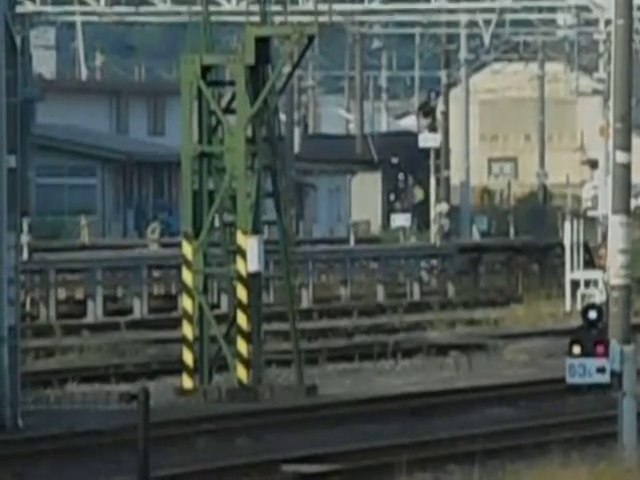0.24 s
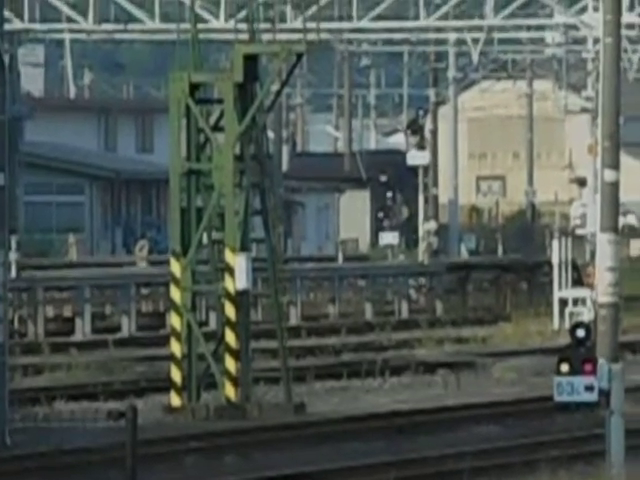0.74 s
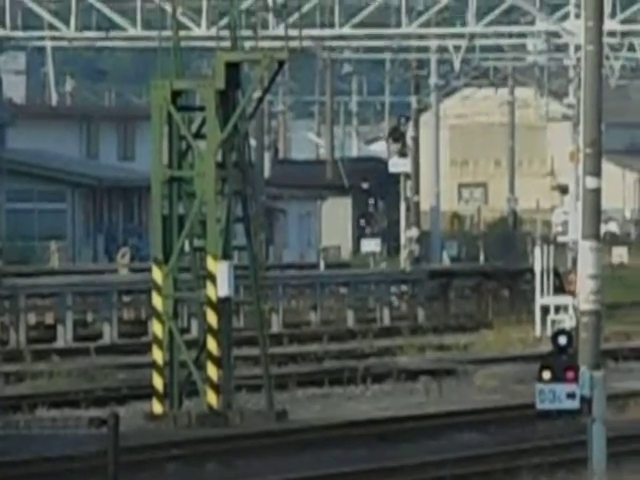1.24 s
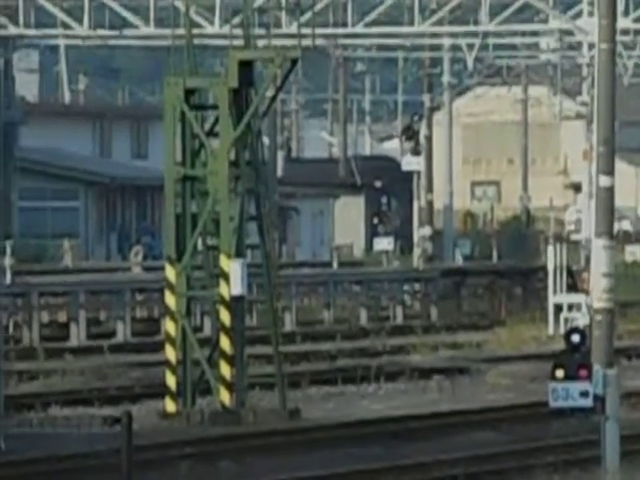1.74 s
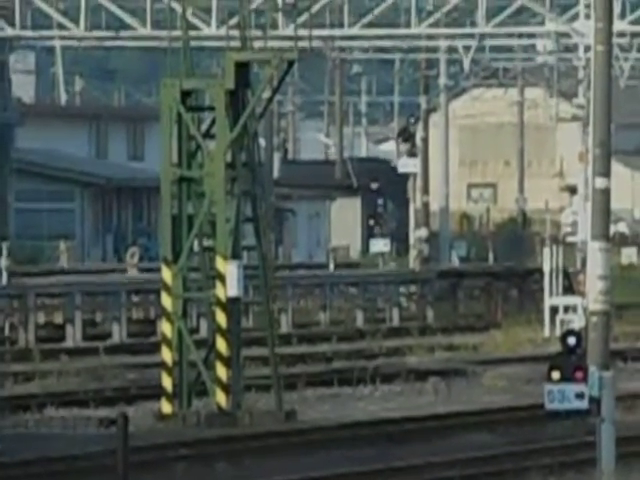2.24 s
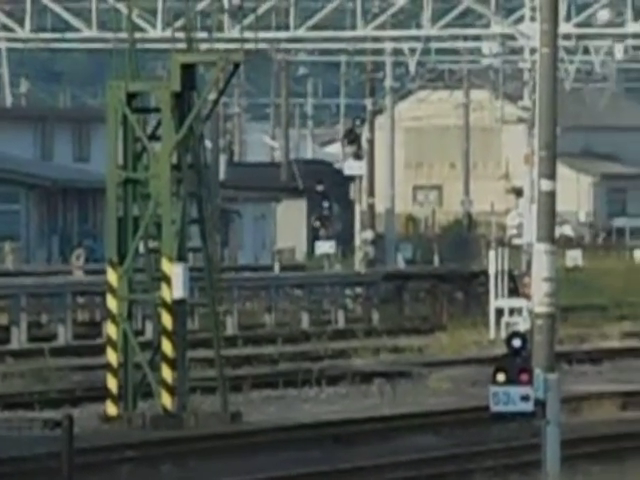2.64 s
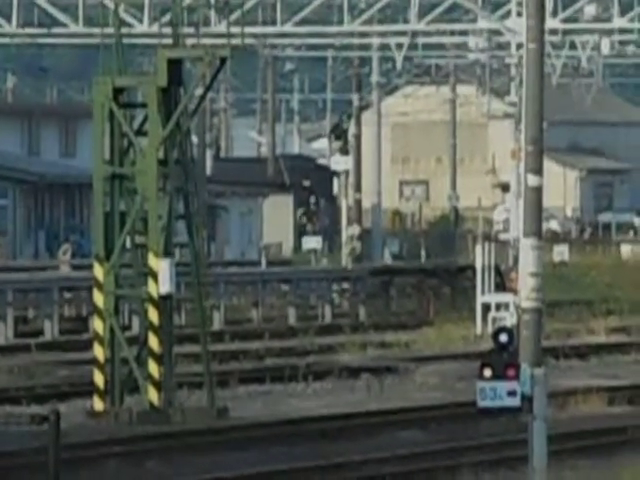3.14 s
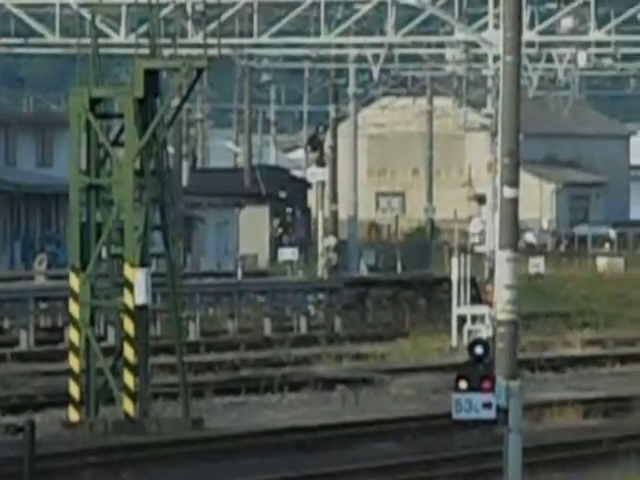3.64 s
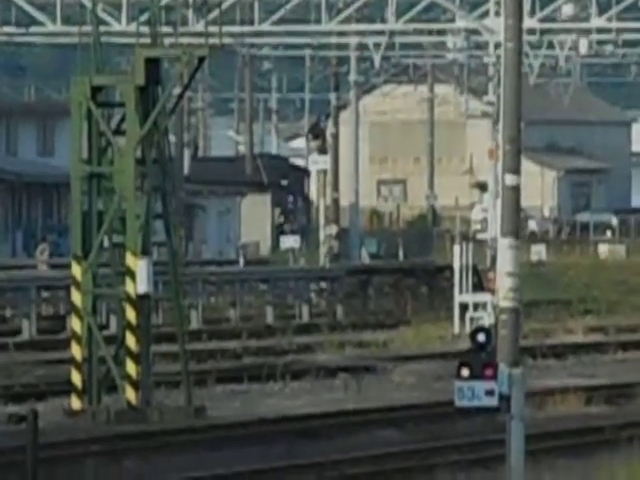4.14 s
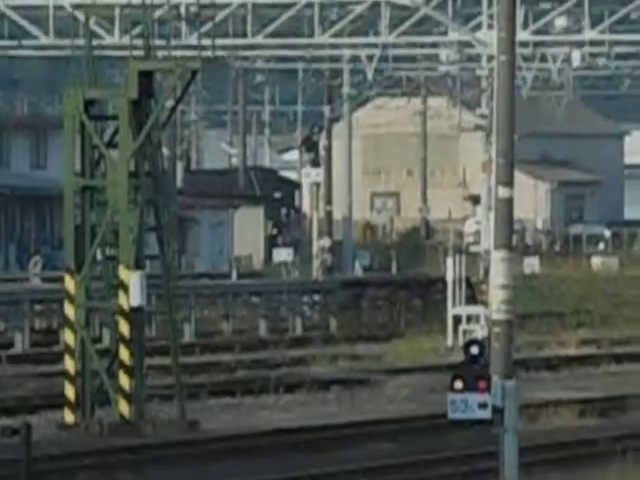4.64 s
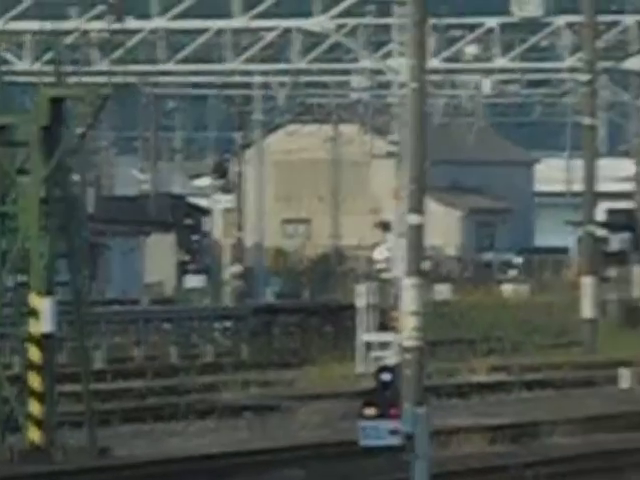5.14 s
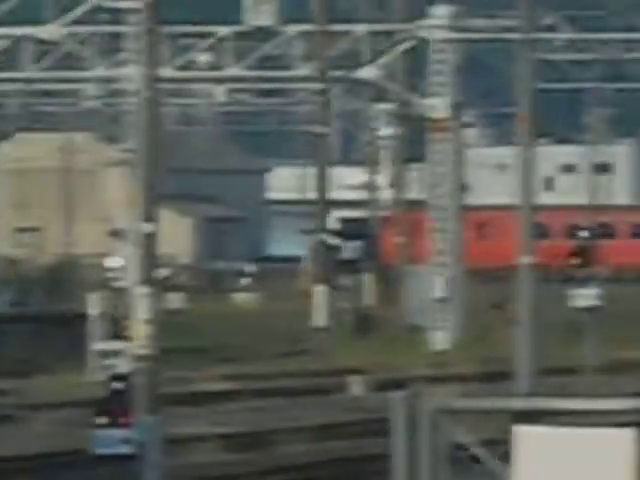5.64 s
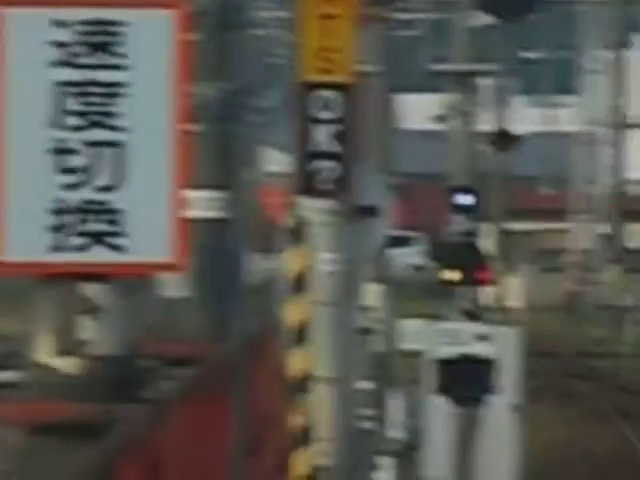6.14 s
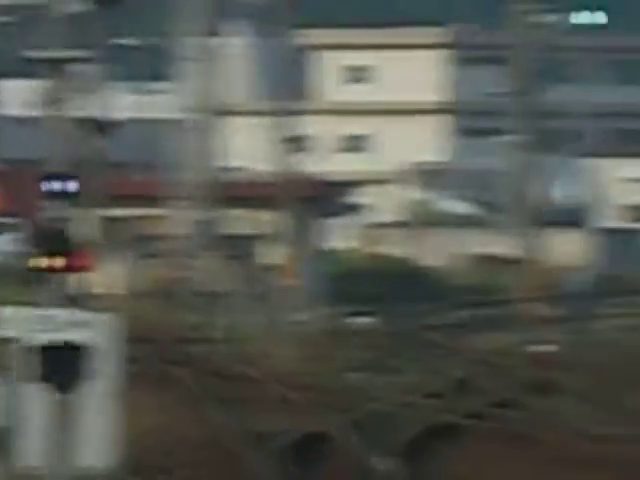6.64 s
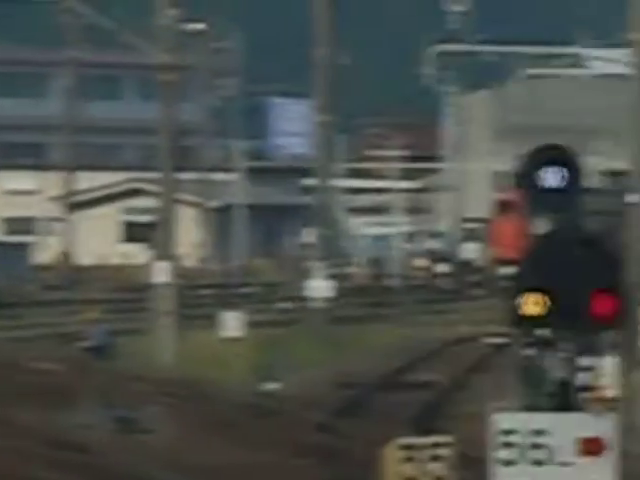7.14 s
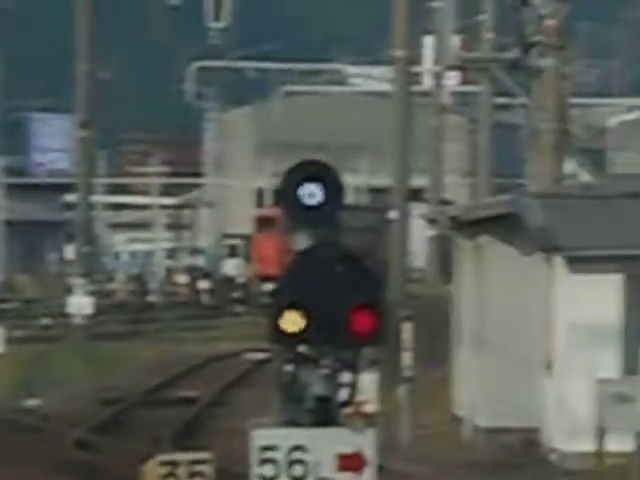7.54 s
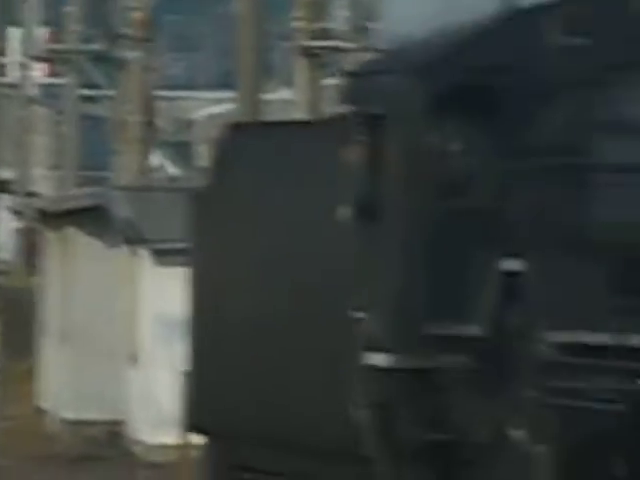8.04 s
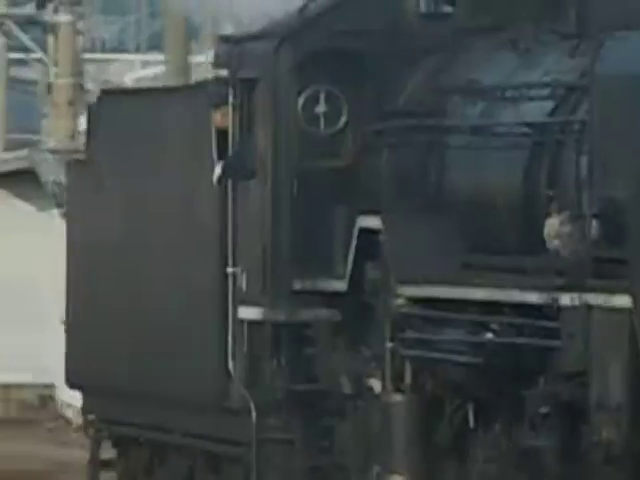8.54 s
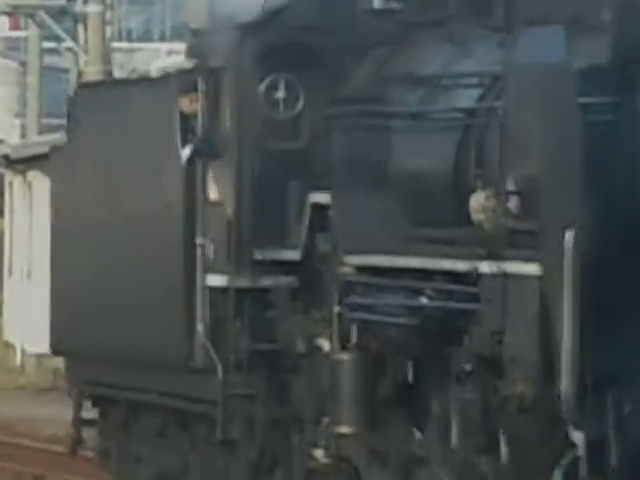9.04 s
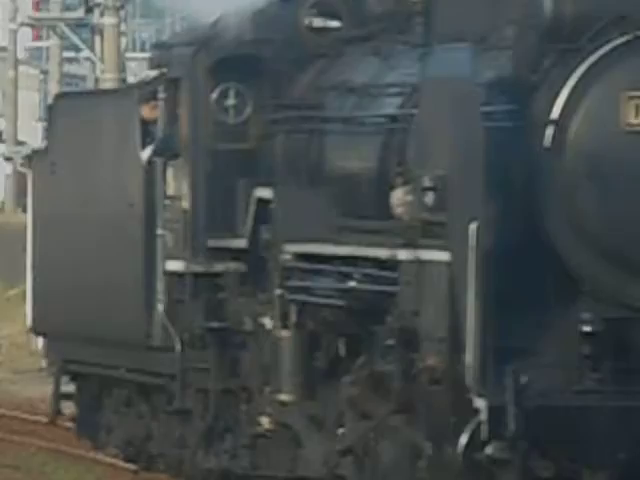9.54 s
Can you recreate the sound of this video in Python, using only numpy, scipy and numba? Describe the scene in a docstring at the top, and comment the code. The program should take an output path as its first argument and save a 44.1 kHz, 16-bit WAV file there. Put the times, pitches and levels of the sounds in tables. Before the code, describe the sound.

A steam locomotive is heard from one spot beside the track in a rail yard. From the start, a loud, bright steam hiss sputters and surges, almost burying a few wheel knocks, with one tiny squeak at 1.3 seconds. At about 2.9 seconds the hiss cuts off suddenly and the quieter rolling swells up: a gritty rumble, uneven knocks over rail joints, ringing rod clanks and hollow thumps, over a faint, thin whine. A wheel flange squeals in broken, rasping bursts from 3.2 to 4 seconds. Quick high chirps come around 4.8 and 5.2 seconds. The knocks and clanks are busiest until about 6 seconds, then thin out amid light scraping. From 8.1 to 8.8 seconds comes a run of chirps with another brief squeal. A wavering brake groan builds from about 8.4 seconds and fades near 9.8 as the rolling continues. Impacts carry a short, dull echo.

```python
"""Steam locomotive in a rail yard

From one spot beside the track: a creeping engine blows off steam so loudly that the camera's gain
control ducks everything else. The valve shuts, the gain comes back and the engine rolls past the
microphone: wheels knock over joints, the frame booms, rods clank, flanges squeal, a brake block
groans and the turbo-generator whines. Sheds and wagons echo around it."""
import sys
import numpy as np
from scipy import signal
from scipy.fft import rfft, irfft, next_fast_len
from scipy.io import wavfile
from scipy.ndimage import uniform_filter1d
from numba import njit

SR = 44100
rng = np.random.default_rng(int(sys.argv[2]) if len(sys.argv) > 2 else 0)


def wav_out(sig):
    """Save sig, one row per channel (or a flat mono array), as 16-bit PCM at SR to the path in sys.argv[1]."""
    wavfile.write(sys.argv[1], SR, np.round(np.clip(np.atleast_2d(sig).T, -1, 1) * 32767).astype(np.int16))


N = 431738
TIME = np.arange(N) / SR
PADDED = next_fast_len(N + SR // 2, real=True)
BIN_HZ = np.maximum(np.fft.rfftfreq(PADDED, 1 / SR), 1)

# the running gear as it passes the microphone: (time [s], level [dB], bass [dB], treble [dB])
PASS_BY = [(0, -1, -7, -5), (2.8, -2, -7.5, 5), (3.08, 0.5, -5.5, 9), (3.35, 1, -4, 3),
           (3.95, -0.5, -1, 4.5), (4.5, -0.5, -0.5, 2), (4.85, 0.7, 0.5, 1.5), (5.6, 0.5, -1.5, 1.5),
           (6.4, 0.45, 0.5, 0), (7.3, .5, -2, -0.5), (7.85, -1, 0, -1.5), (8.25, 0.4, -1, 0),
           (8.62, 0.4, -0.5, -2.5), (9.2, -4, -1, -3), (9.78, -4, 0.5, -2.5)]
# resonances of wheels, rails and frame: (frequency [Hz], width [Hz], lift [dB])
STEEL_MODES = [(339, 69, 3), (527, 56, 3.5), (620, 36, 3.5), (718, 34, 4), (796, 33, 1), (1079, 77, 4.5),
               (1584, 190, 3), (2070, 98, 5), (2730, 170, 2), (3280, 150, 3)]


def steam(shut_s=2.888, closing_s=0.055, note_width_hz=1170, ground_lag_s=0.000308, ground_fade_s=1):
    """A turbulent jet; carried water makes it sputter and surge, and the ground echo colours it."""
    # the jet's spectrum: (frequency [Hz], density [dB])
    spectrum = [(400, -54), (1000, -28), (1400, -21.5), (1800, -11.5), (2400, -7.5), (3400, -2.5),
                (4200, -3.5), (5400, -4), (6900, -4), (8000, -6.5), (9200, -9.5), (10000, -16.5),
                (10600, -29)]
    # the jet chokes now and then: (centre time [s], length [s], depth [dB])
    chokes = [(0.543, 0.2, 1), (1.138, 0.25, 4), (1.453, 0.48, 1), (2.387, 0.19, 0.7)]
    # swells around one pitch: (centre time [s], length [s], pitch [Hz], width [octaves], level [dB])
    surges = [(0.077, 0.61, 3380, 0.53, -13.5), (.22, 0.93, 6750, .13, -16), (0.676, 0.2, 6600, .15, -12),
              (.9, 1, 8700, 0.13, -17), (1.297, 0.15, 7300, 0.35, -10), (1.357, 0.11, 3060, 0.96, -11),
              (1.508, 0.9, 2760, 1, -9.5), (1.69, .25, 6300, 0.23, -9), (1.84, .16, 2500, 0.22, -23),
              (2.05, 1, 4260, 0.4, -13), (2.46, .24, 7640, 0.18, -11.5), (2.493, 0.61, 3420, 0.67, -10.5),
              (2.69, 0.58, 4100, 0.65, -6), (2.797, 0.13, 6950, 0.44, -11)]
    # the outlet's resonance sinks and wavers: (time [s], pitch [Hz], level [dB])
    outlet_note = [(0, 5750, -9.5), (.33, 5850, -9), (.45, 5530, -8), (.68, 5670, -11.5), (.95, 5445, -10),
                   (1.2, 5420, -9), (1.42, 5350, -16), (1.6, 5360, -8.5), (1.8, 5540, -15),
                   (1.98, 5480, -8), (2.25, 5210, -11.5), (2.42, 4820, -15), (2.66, 5120, -9.5),
                   (2.84, 5460, -21)]
    flutter_db, sputter_db = 0.5 * walk(15), 0.46 * walk(130)
    flow_db = flutter_db + sputter_db - sum(swell(*row) for row in chokes)
    eddies, timbre, jet = rng.standard_normal(N), colour(spectrum), 0
    for db, band in zip((-15.5, -9, -15), three_bands(4290, 7170)):  # rush, hiss, sizzle
        flicker_db = 1.04 * walk(16) + 0.4 * walk(5.04)
        jet += unit(shaped(eddies, band ** 2 * timbre)) * undb(db + flicker_db)
    for s, length, hz, octaves, db in surges:
        surge = unit(shaped(rng.standard_normal(N), bell(BIN_HZ, hz, octaves) * timbre))
        jet += surge * swell(s, length, undb(db))
    note_hz, note_db = curves(outlet_note)
    jet += gliding_noise(note_hz, note_width_hz) * undb(note_db)
    ground_gain = 0.12 * np.clip(1 - TIME / ground_fade_s, 0, 1)  # fades as the engine moves
    jet += ground_gain * np.interp(TIME - ground_lag_s, TIME, jet)
    opening = np.clip((shut_s - TIME) / closing_s, 0, 1)
    return yard(jet * undb(flow_db) * opening, t60=0.87, wet_db=-17.5, damp_hz=7400)


def rolling(steel, grit=0.34, bass_hz=260):
    """Rough treads crush grit; level and colour shift as the engine comes alongside."""
    level_db, bass_db, treble_db = curves(PASS_BY)
    judder_db = 0.5 * walk(27)
    contact = rng.standard_normal(N) + grit * grains(rate=1200)
    bands_db = (-40.5, -37, -42.5 + treble_db)  # rumble, clatter, scrape
    out = 0
    for db, band in zip(bands_db, three_bands(950, 3380)):
        flicker_db = walk(12.3)
        out += unit(shaped(contact, steel * band ** 2)) * undb(db + level_db + judder_db + flicker_db)
    return out + shaped(out, below(bass_hz, order=8)) * (undb(bass_db) - 1)


def knocks(steel, rise_s=0.0037, decay_s=0.026, halving_db=40, lowest_hz=170, ring_db=-5.5):
    """Joint knocks and clinks ring and rattle; hard knocks are bright and short, heavy ones dull."""
    # wheels strike rail joints: (time [s], level [dB], brightness [dB/octave])
    joints = [(.191, -18.5, -2), (.411, -19, 3), (.65, -26, -2), (0.905, -22, -7), (1.187, -26, -4.5),
              (1.245, -20, 0.5), (1.292, -19, 0.5), (1.419, -27, -4), (1.561, -34, -7), (1.87, -32, -10),
              (3.06, -26, 2.5), (3.211, -32, -3), (3.253, -26, 1), (3.332, -25.5, 0.5),
              (3.383, -26.5, -0.5), (3.494, -24.5, 1), (3.621, -25, -2), (3.672, -31.5, -2.5),
              (4.02, -25.5, -1.5), (4.192, -25, -1.5), (4.48, -28.5, -2.5), (4.635, -31, -9),
              (4.647, -23.5, 3.5), (4.795, -25, -1.5), (5.28, -27.5, 0.5), (5.322, -26, -1.5),
              (5.384, -31.5, 1.5), (5.432, -25.5, 6.5), (5.556, -26, -1), (6.315, -31, 0),
              (6.368, -30.5, -3), (6.938, -32, 2), (6.988, -30.5, -0.5), (7.346, -28.5, -0.5),
              (7.379, -32, 0.5), (8.507, -33, -1), (8.621, -30.5, -1.5), (8.881, -30, -4.5),
              (9.023, -31, -2), (9.416, -32, -6)]
    out, t = np.zeros(N), TIME[:SR // 4]
    contact = rng.standard_normal(N) + 0.23 * grains(rate=1600)
    shaking = shaped(contact, steel * (1 - below(lowest_hz)))
    octaves = np.log2(np.clip(np.fft.rfftfreq(len(t), 1 / SR), 400, 7000) / 1000)
    blows = [(s, db, bright, decay_s * .5 ** (bright / halving_db)) for s, db, bright in joints]
    blows += clinks()
    chances = rng.standard_normal((100, 2, len(STEEL_MODES)))
    for (s, db, bright, decay), chance in zip(blows, chances):
        piece = shaking.take(int(s * SR) + np.arange(len(t)), mode="wrap")
        rattle = unit(irfft(rfft(piece) * undb(bright * octaves), len(t))) * np.exp(-t / decay)
        blow = rattle + undb(ring_db) * clang(t, chance, bright)
        add(out, s, undb(db) * blow * (1 - np.exp(-t / rise_s)))
    return yard(out, t60=0.56, wet_db=-7.5, damp_hz=4000)


def clang(t, chance, brightness, spread_db=4, detune=0.02):
    """The steel rings on after a blow; every contact point favours different modes."""
    hz, width, lift_db = np.transpose(STEEL_MODES)
    size = undb(lift_db + (brightness - 0.5) * np.log2(hz / 1000) + spread_db * chance[0])
    pole = 2j * np.pi * hz * (1 + detune * chance[1]) - 0.99 * np.pi * width
    ring = size @ np.exp(pole[:, None] * t).imag
    return ring / np.sqrt(np.sum(size ** 2) / 2)


def clinks(count=60, per_s=3.7, level_db=-42.5, decay_s=0.028):
    """Loose fittings strike unevenly: (time [s], level [dB], brightness [dB/octave], decay [s])."""
    shift, size, tone = rng.standard_normal((count, 3)).T
    times = np.abs(np.arange(count) + .5 * shift) / per_s
    levels_db = level_db + 1.5 * size + np.interp(times, TIME, curves(PASS_BY)[0])
    brightness = -2.5 + 2 * tone
    return [(s, db, b, decay_s) for s, db, b in zip(times, levels_db, brightness) if s < TIME[-1]]


def clanks(bounce_s=.013, bounce_db=-7.5, modes=7, spread_octaves=0.303, ring_db=-3.5, rattle_db=-3):
    """Slack parts strike and bounce; each bounce rattles and favours other modes near their pitch."""
    # rods and couplings: (time [s], pitch [Hz], level [dB])
    strikes = [(3.215, 695, -33), (3.305, 755, -30.5), (3.622, 592, -26), (3.662, 1350, -27),
               (3.7, 720, -36), (4.235, 806, -26.5), (4.24, 1570, -32), (4.395, 1793, -30),
               (4.636, 555, -29.5), (4.649, 639, -24), (4.653, 1620, -34), (4.653, 4470, -29),
               (4.8, 2185, -30), (4.84, 3270, -26), (4.875, 857, -26), (5.32, 1650, -25),
               (5.325, 810, -28.5), (5.4, 960, -31), (5.769, 1450, -29), (5.775, 773, -29),
               (5.82, 725, -28.5), (5.965, 1360, -28), (6.01, 784, -26.5), (6.37, 1550, -38),
               (6.42, 850, -27), (6.94, 1994, -30), (6.985, 1340, -32), (7.245, 646, -32),
               (7.35, 2780, -31), (7.381, 3260, -33), (8.055, 654, -33), (8.555, 950, -34),
               (8.595, 1090, -31), (8.66, 1600, -33), (9.03, 1920, -33)]
    out, t = np.zeros(N), TIME[:4096]
    rattle_shape = impact(t, rise_s=0.0024, decay_s=0.01)
    ring_shape = impact(t, rise_s=0.0024, decay_s=0.018)
    taper = np.hanning(modes + 2)[1:-1]
    for s, hz, db in strikes:
        offsets = np.linspace(-1, 1, modes) + rng.standard_normal(modes) / modes
        mode_hz = hz * 2 ** (spread_octaves * offsets)
        waves = np.sin(2 * np.pi * mode_hz[:, None] * t)
        for bounce in range(4):
            ring = undb(ring_db) * unit((rng.standard_normal(modes) * taper) @ waves) * ring_shape
            rattle = undb(rattle_db) * burst(hz, octaves=.7, shape=rattle_shape)
            delay_s = bounce_s * (bounce + (rng.random() - .5) * (bounce > 0))
            add(out, s + delay_s, undb(db + bounce * bounce_db) * (ring + rattle))
    return yard(out, t60=0.42, wet_db=-6.5, damp_hz=4000)


def thuds():
    """The engine's weight drops onto the rail; the frame thumps or booms in one hollow note."""
    # the frame's answers: (time [s], pitch [Hz], width [octaves], level [dB])
    booms = [(0.189, 333, .45, -31), (0.906, 270, 0.97, -32), (3.211, 200, 0.87, -43),
             (3.615, 200, 0.95, -40.5), (3.94, 330, .15, -46), (4.017, 320, 0.36, -37),
             (4.205, 330, 0.13, -37.5), (4.48, 328, .15, -40), (4.627, 220, .9, -37),
             (4.649, 200, 0.59, -42), (5.015, 327, .15, -38.5), (5.565, 330, .15, -40),
             (6.131, 327, 0.11, -42), (6.63, 327, 0.13, -40.5), (6.84, 335, 0.13, -44),
             (7.37, 280, 0.74, -42), (7.625, 332, 0.14, -42), (8.618, 240, .6, -42.5)]
    out = np.zeros(N)
    shape = impact(TIME[:SR // 5], rise_s=0.0024, decay_s=0.026)
    for s, hz, octaves, db in booms:
        add(out, s, undb(db) * burst(hz, octaves, shape / shape.max()))
    return out


def flange(rise_s=0.034, fall_s=0.033, wander=.004, hop=.037, rasp_db=-7.5, rasp_width_hz=170):
    """A flange grips the rail unevenly and squeals, rasping and hopping between two wheel modes."""
    # each bite: (start [s], length [s], pitch [Hz], level [dB], lift of even partials [dB])
    squeals = [(3.197, 0.16, 2122, -41, 0), (3.3, 0.245, 2114, -36, 2), (3.563, 0.12, 2125, -37, 4),
               (3.65, 0.18, 2120, -38, -7), (3.829, 0.16, 2126, -35.5, 5), (3.98, 0.082, 2110, -41, 4),
               (6.116, 0.117, 2160, -52, 8.5), (8.257, 0.27, 2160, -42, -1)]
    # harmonics from the fundamental up: (level [dB])
    harmonics_db = [-3, -2.5, -15, -20]
    bite = 0
    for s, length, _, db, _ in squeals:
        ramps = np.minimum((TIME - s) / rise_s, (s + length - TIME) / fall_s)
        bite += undb(db) * np.clip(ramps, 0, 1)
    bite *= undb(1.5 * walk(20))
    hz, even_db = curves([(s + length / 2, pitch, lift) for s, length, pitch, _, lift in squeals])
    partials_db = [db + k % 2 * even_db for k, db in enumerate(harmonics_db)]
    rasp = gliding_noise(hz, rasp_width_hz) + gliding_noise(2 * hz, 2 * rasp_width_hz)
    pitch = hz * (1 + wander * walk(22) + hop * (walk(24) > 1))
    squeal = friction(pitch, bite, partials_db, jitter=0.0135, jitter_hz=283, waver_db=3, waver_hz=45.2)
    return squeal + rasp * bite * undb(rasp_db)


def brake(groan_hz=523.6, sag_hz=7.7, wheel_db=-5):
    """The block drags on a tyre, groans lower as it presses harder and excites a wheel mode."""
    # the block's changing pressure: (time [s], level [dB])
    drag = [(7.9, -68), (8.02, -55.5), (8.28, -52.5), (8.44, -44), (8.52, -38.5), (8.59, -46),
            (8.66, -39.5), (8.73, -49), (8.84, -45.5), (8.9, -37.5), (8.97, -43.5), (9.09, -45), (9.2, -41),
            (9.3, -40), (9.33, -52), (9.385, -40), (9.44, -47), (9.53, -41.5), (9.78, -59.5)]
    # harmonics from the fundamental up: (level [dB])
    partials_db = [4.5, -1, -9, -21]
    pressure = undb(curves(drag)[0]) * (TIME > drag[0][0])
    hz = groan_hz - sag_hz * pressure / pressure.max()
    wheel = narrow_noise(hz=1150, width=14) * pressure * undb(wheel_db)
    groan = friction(hz, pressure, partials_db, jitter=0.006, jitter_hz=51.5, waver_db=1.6, waver_hz=13.1)
    return groan + wheel


def friction(hz, strength, partials_db, jitter, jitter_hz, waver_db, waver_hz):
    """Sustained stick-slip: a harmonic tone whose partials swell and fade as the contact shifts."""
    phase = 2 * np.pi * np.cumsum(hz * (1 + jitter * walk(jitter_hz))) / SR
    tone = sum(np.sin(k * phase) * undb(db + waver_db * walk(waver_hz))
               for k, db in enumerate(partials_db, 1))
    return yard(unit(tone) * strength, t60=0.19, wet_db=-3, damp_hz=6900)


def chirps(length_s=0.0202, decay_s=0.014, glide=0.098, jitter=0.042):
    """A dry pin slips in jerks, each a sudden broad scratch with a rough little upward sweep."""
    # quick runs of slips: (time [s], pitch [Hz], level [dB], scratch relative to tone [dB])
    slips = [(4.784, 5100, -29.5, -8), (4.811, 5060, -34, -6), (4.843, 5110, -31, -7),
             (5.183, 5100, -32.5, -10), (5.215, 5150, -39, -6), (5.241, 5130, -33, -8),
             (8.099, 4450, -34.5, 1), (8.149, 4480, -38, 1), (8.197, 4450, -45, 2), (8.242, 4440, -38.5, 0),
             (8.292, 4350, -44, 2), (8.445, 4360, -41, 2), (8.5, 4480, -38.5, 1), (8.551, 4530, -37, 1),
             (8.597, 4400, -38, 2), (8.648, 4400, -38, 1), (8.697, 4550, -39.5, 0), (8.744, 4400, -37, 0),
             (8.815, 4300, -43, -1)]
    out, n = np.zeros(N), int(length_s * SR)
    wobble, sweep = jitter * walk(700), glide * np.linspace(-.5, .5, n)
    shape = signal.windows.tukey(n, .15) * np.exp(-TIME[:n] / decay_s)
    for s, hz, db, scratch_db in slips:
        cycles = np.cumsum(hz * (1 + sweep + wobble[int(s * SR):][:n])) / SR
        tone = unit(np.sin(2 * np.pi * cycles)) * shape
        scratch = undb(scratch_db) * burst(hz, octaves=0.64, shape=shape)
        add(out, s, undb(db) * (tone + scratch))
    return yard(out, t60=0.25, wet_db=-7, damp_hz=7000)


def squeaks(jitter=0.052):
    """Brief tones with an unsteady pitch: a short steam whistle, squeaks and pings."""
    # whistles and squeaks: (start [s], pitch [Hz], level [dB], length [s])
    tones = [(0.601, 923, -47, 0.96), (1.335, 3570, -13, .045), (2.95, 477, -46, 0.27),
             (3.17, 484.5, -51.5, 0.38), (3.533, 2620, -41, 0.088)]
    out, wobble = np.zeros(N), jitter * walk(500)
    for s, hz, db, length in tones:
        n = int(length * SR)
        cycles = np.cumsum(hz * (1 + wobble[int(s * SR):][:n])) / SR
        add(out, s, undb(db) * unit(np.sin(2 * np.pi * cycles) * signal.windows.tukey(n, .5)))
    return out


def scrapes():
    """Steel rubs on steel and keeps one resonance ringing for a moment."""
    # a rubbing wheel: (start [s], length [s], pitch [Hz], width [octaves], level [dB])
    rubs = [(3.099, .62, 3365, 0.02, -42), (3.21, 0.14, 690, .15, -43), (3.655, 0.06, 720, 0.14, -33),
            (5.74, .26, 730, 0.13, -46), (5.85, 1.5, 3360, .016, -51), (6.18, .12, 650, 0.33, -42),
            (7.02, 0.36, 680, 0.3, -43), (8.616, .036, 2830, 0.12, -35), (8.88, 0.17, 800, 0.58, -45),
            (9.014, 0.095, 950, 0.11, -39)]
    out = np.zeros(N)
    for s, length, hz, octaves, db in rubs:
        add(out, s, undb(db) * burst(hz, octaves, signal.windows.tukey(int(length * SR), .5)))
    return out


def whine(passing_s=(3, 9.8)):
    """Turbo-generator, ringing steel and singing leaks change in strength as the boiler draws level."""
    # thin steady tones: (pitch [Hz], nominal width [Hz], first level [dB], last level [dB])
    tones = [(767, 16, -54.5, -57), (1232, 10, -56, -50), (1450, 9.6, -59.5, -56),
             (2412, 6.6, -49.5, -57.5), (2765, 12, -51.5, -60), (3368, 10, -46.5, -54),
             (5670, 280, -53.5, -52), (6240, 75, -52.5, -49.5), (6700, 380, -55, -53)]
    return sum(narrow_noise(hz, width) * undb(np.interp(TIME, passing_s, [first_db, last_db]))
               for hz, width, first_db, last_db in tones)


def steel_response():
    """Wheels, rails and frame lift their resonances out of a broad spectrum."""
    # the running gear's spectrum: (frequency [Hz], density [dB])
    spectrum = [(25, -20), (50, -11), (95, -7), (140, -3), (440, -5), (600, -0.5), (900, -0.5), (1350, -1),
                (2500, -1.5), (3600, 1), (4800, -2), (6800, -8.5), (8000, -14), (9600, -22.5), (10600, -38)]
    peaks = sum((undb(db) - 1) / (1 + 2j * (BIN_HZ - hz) / width) for hz, width, db in STEEL_MODES)
    return colour(spectrum) * (1 + peaks)


def yard(x, t60, wet_db, damp_hz):
    """Sheds and wagons return a diffuse, duller tail behind the direct sound."""
    t = TIME[:SR]
    tail = rng.standard_normal(SR) * undb(-60 * t / t60) * (1 - np.exp(-t / 0.018))
    tail = signal.lfilter(*signal.butter(2, damp_hz, fs=SR), tail / np.sqrt(np.sum(tail ** 2)))
    return x + undb(wet_db) * signal.fftconvolve(x, tail)[:N]


def undb(db):
    """Decibels to gain."""
    return 10 ** (np.asarray(db) / 20)


def unit(x):
    """Scale to rms 1."""
    return x / np.sqrt(np.mean(x ** 2) + 1e-18)


def add(out, s, x):
    """Mix x into out at time s."""
    i = max(int(s * SR), 0)
    out[i:i + len(x)] += x[:max(N - i, 0)]


def curves(table):
    """Each column after the time column as a control signal."""
    s, *columns = np.transpose(table)
    return [np.interp(TIME, s, c) for c in columns]


def swell(s, length, height):
    """A smooth hump centred on time s."""
    return height * np.cos(np.pi * np.clip((TIME - s) / length, -.5, .5)) ** 2


def impact(t, rise_s, decay_s):
    """Envelope of a blow."""
    return np.exp(-t / decay_s) * (1 - np.exp(-t / rise_s))


def colour(points):
    """Gain at every frequency from (frequency [Hz], level [dB]) points."""
    hz, db = np.transpose(points)
    return undb(np.interp(np.log(BIN_HZ), np.log(hz), db))


def below(hz, order=4):
    """Gain of a smooth low-pass."""
    return 1 / np.sqrt(1 + (BIN_HZ / hz) ** order)


def bell(bin_hz, hz, octaves):
    """Gain of a bell-shaped band around hz."""
    return np.exp(-(np.log2(bin_hz / hz) / octaves) ** 2)


def three_bands(low_hz, high_hz):
    """Low, middle and high gains whose powers add up to one."""
    low, lower_two = (below(hz, order=12) ** 2 for hz in (low_hz, high_hz))
    return np.sqrt([low, np.abs(lower_two - low), 1 - lower_two])


def shaped(x, gain):
    """Filter by a gain at every frequency."""
    return irfft(rfft(x, PADDED) * gain, PADDED)[:N]


def walk(rate):
    """A random curve of rms 1, swinging about rate times a second."""
    values = rng.standard_normal(N // 20)
    return unit(np.interp(TIME * 2 * rate, np.arange(len(values)), values))


def grains(rate, spread_db=1):
    """Tiny impacts of unequal size, rate a second."""
    size = undb(spread_db * np.minimum(rng.exponential(size=N), 5))
    return unit((rng.random(N) < rate / SR) * rng.standard_normal(N) * size)


def narrow_noise(hz, width):
    """A wavering tone of rms 1."""
    resonance = 1 / (1 + ((BIN_HZ - hz) / (0.94 * width)) ** 2)
    return unit(shaped(rng.standard_normal(N), resonance))


def gliding_noise(hz, width):
    """Noise of rms 1 in a resonance whose centre moves."""
    a, b = (shaped(rng.standard_normal(N), below(width / 2, order=6)) for _ in range(2))
    phase = 2 * np.pi * np.cumsum(hz) / SR
    return unit(a * np.cos(phase) + b * np.sin(phase))


def burst(hz, octaves, shape):
    """Noise around one pitch under an envelope, with that envelope's rms."""
    n = len(shape)
    bin_hz = np.maximum(np.fft.rfftfreq(n, 1 / SR), 1)
    noise = irfft(rfft(rng.standard_normal(n)) * bell(bin_hz, hz, octaves), n)
    return unit(noise * shape) * np.sqrt(np.mean(shape ** 2))


def scene():
    """The whole engine as it reaches one microphone beside the track."""
    steel = steel_response()
    engine = steam() + rolling(steel) + knocks(steel) + thuds() + clanks()
    rubbing = scrapes() + squeaks() + chirps() + flange() + brake()
    return (engine + rubbing + whine())[None]


@njit
def recover(wanted, step):
    """Gain reduction that bites at once and lets go by a fixed step a sample."""
    out, cut = np.empty(len(wanted)), 0.
    for i in range(len(wanted)):
        cut = max(wanted[i], cut - step)
        out[i] = cut
    return out


def record(dry, threshold_db=-22, steepness=1.95, depth_db=20, release_db_per_s=92, top_hz=12400):
    """The camera's gain control ducks loud sound by a limited depth; the top is cut."""
    # the very top: a deep notch near 11 kHz with a faint band above it: (frequency [Hz], gain [dB])
    top_response = [(10400, 0), (10750, -7), (11050, -32), (11400, -11.5), (11900, -11), (12400, -18)]
    power = np.abs(uniform_filter1d(dry[0] ** 2, size=SR // 20))
    heard_db = 10 * np.log10(power + 1e-12)
    cut_db = np.clip(steepness * (heard_db - threshold_db), 0, depth_db)
    ducked = dry[0] * undb(-recover(cut_db, release_db_per_s / SR))
    low_pass = signal.ellip(8, .2, 70, top_hz, fs=SR, output="sos")
    return signal.sosfilt(low_pass, shaped(ducked, colour(top_response))[None])


dry = scene()
out = record(dry)
wav_out(out)
```